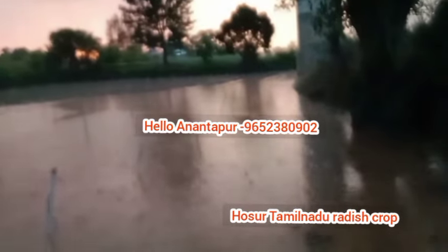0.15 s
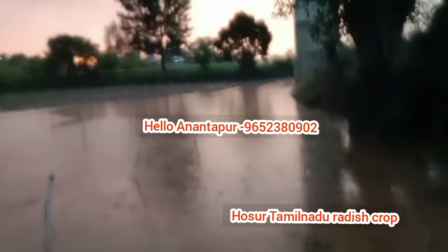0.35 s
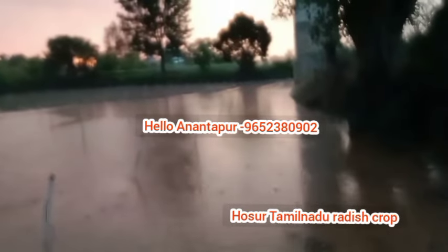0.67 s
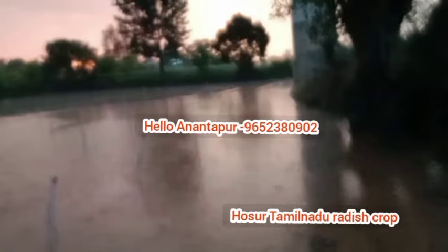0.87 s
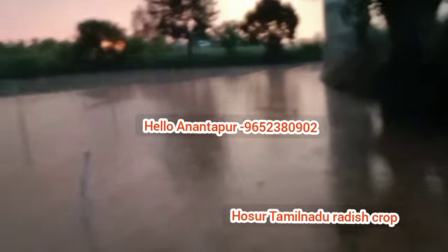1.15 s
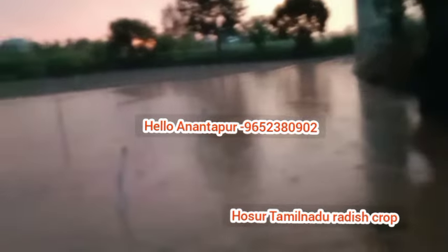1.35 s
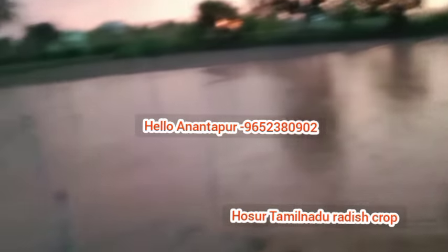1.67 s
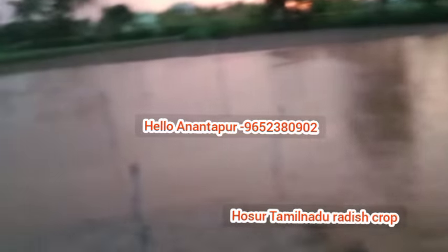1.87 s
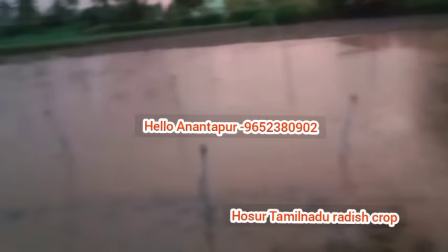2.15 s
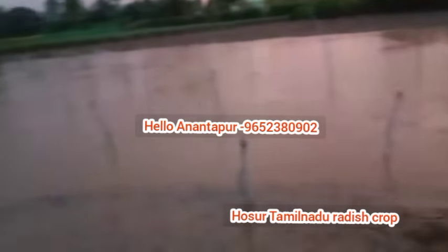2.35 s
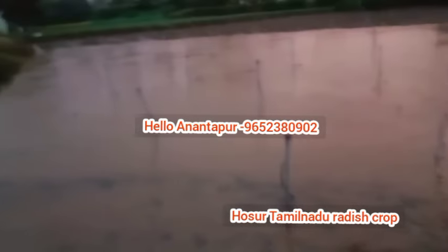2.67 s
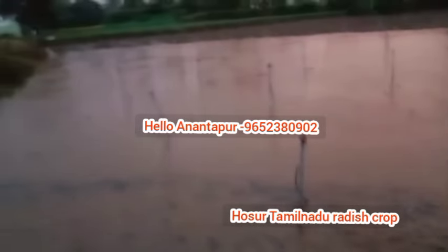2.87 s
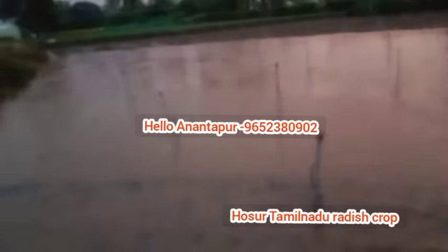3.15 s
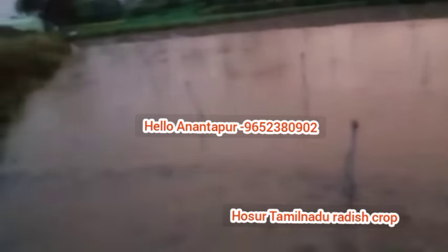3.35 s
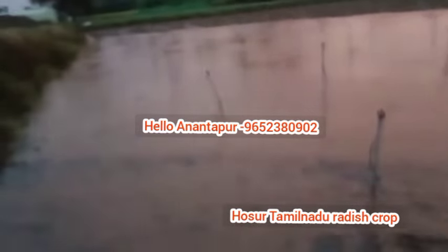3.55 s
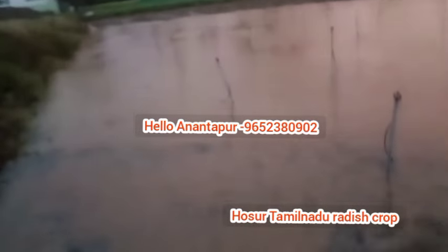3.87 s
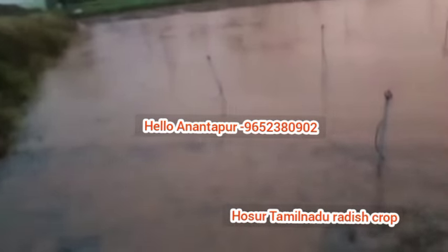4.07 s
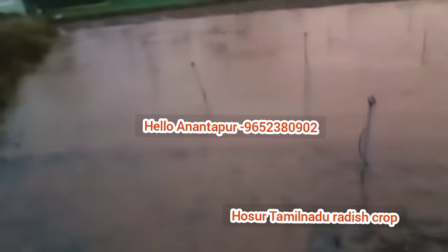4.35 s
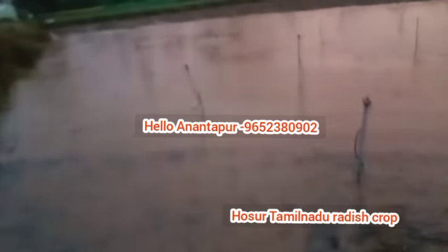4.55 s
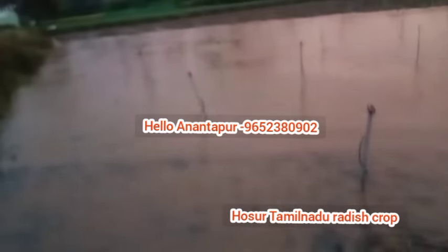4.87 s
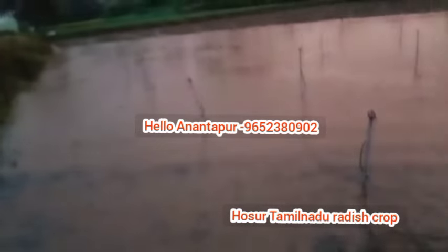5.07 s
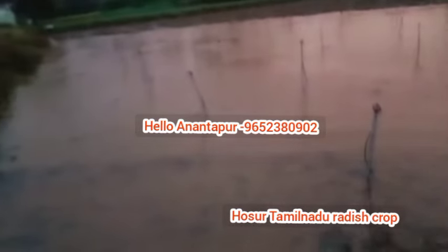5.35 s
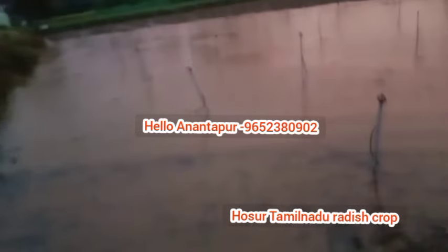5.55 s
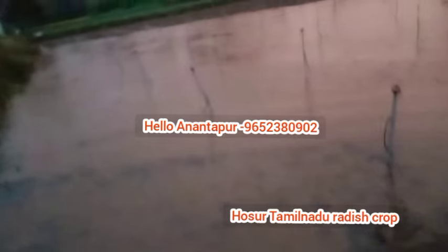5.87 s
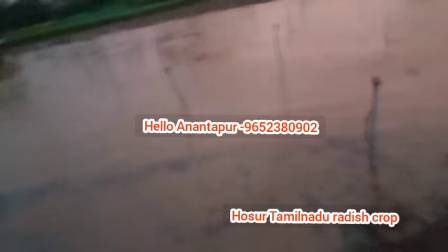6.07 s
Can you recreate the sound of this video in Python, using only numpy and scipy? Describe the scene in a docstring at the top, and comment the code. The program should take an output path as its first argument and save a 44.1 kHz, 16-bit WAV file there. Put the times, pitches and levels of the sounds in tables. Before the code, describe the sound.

Gusty breeze buffets the microphone while soft rain patters on standing water; close drops snap and plop, and faint thin trills emerge at the end.

```python
"""A breeze rumbles up close over steady rain on a flooded field, as a small, dull microphone hears it.
Wind is shaped noise that gusts; far rain is many tiny grains blurred into drumming, splashing and hiss.
Nearer drops are short bursts of noise, knocks and ringing tones; trapped bubbles plink upward in pitch.
Late on there is a watery swish, made of noise in rising resonances, and then thin trills of narrow noise."""
import sys
import numpy as np
from scipy import signal
from scipy.fft import rfft, irfft, next_fast_len
from scipy.io import wavfile
from scipy.ndimage import uniform_filter1d, map_coordinates

SR = 44100
rng = np.random.default_rng(int(sys.argv[2]) if len(sys.argv) > 2 else 0)


def store_wav(level_fs):
    """Save 16-bit WAV to argv[1]."""
    pcm = np.round(np.clip(np.atleast_2d(level_fs), -1, 1) * 32767)
    wavfile.write(sys.argv[1], SR, pcm.T.astype(np.int16))


N = 273861
TIME = np.arange(N) / SR  # [s]

# Levels in the tables come before any trim in the functions and before the final filters.

# the breeze between gusts: (time [s], deep boom [dB], low rumble [dB], higher rush [dB])
WIND = [(0, -28, -27, -32), (1.05, -31, -23.5, -32), (1.8, -30.5, -22, -31), (2.2, -35.5, -28, -36.5),
        (2.85, -53.5, -24.5, -36.5), (3.3, -51.5, -23, -37), (3.58, -41, -28.5, -39.5),
        (3.95, -43, -25, -38.5), (4.35, -43, -22, -34.5), (4.8, -35.5, -22.5, -36.5), (5.5, -33, -22, -33),
        (6.21, -31.5, -24, -38)]
# gusts and lulls on top of it: (middle [s], half length [s], change [dB])
GUSTS = [(0.35, 0.15, 5), (0.937, 0.14, 6.5), (1.251, 0.012, 7), (1.646, 0.066, 3.5), (2.356, 0.037, 7.5),
         (2.52, 0.027, -2), (3.27, 0.016, -8.5), (3.578, 0.017, -7), (3.879, 0.012, 6.5),
         (4.038, 0.015, 5.5), (4.587, 0.029, -5), (4.835, 0.068, -5.5), (4.998, 0.066, 6.5),
         (5.366, 0.018, 7.5), (5.472, 0.018, 4), (5.707, 0.02, 5.5), (5.236, 0.047, -2)]
# deep buffets of wind on the microphone: (crest [s], half length [s], level [dB], pitch [Hz])
BUFFETS = [(0.395, 0.068, -22, 116), (2.646, 0.014, -24.5, 89), (5.341, 0.041, -21.5, 134),
           (5.633, 0.099, -23.5, 168)]
# tone colour of the wind's three layers: (frequency [Hz], level per Hz [dB])
BOOM_COLOUR = [(22, -39), (40, -21), (62, -3.5), (110, 2), (170, -7), (400, -63), (2000, -100)]
RUMBLE_COLOUR = [(22, -55), (40, -39.5), (62, -8.5), (110, -11), (150, -0.5), (200, 2.5), (285, -5.5),
                 (370, -4), (480, -14), (700, -23), (1200, -94), (4000, -100)]
RUSH_COLOUR = [(250, -7.5), (520, 4.5), (720, -1), (1000, -7), (1400, -19.5), (2000, -28), (3000, -85),
               (8000, -92)]
RUMBLE_TRIM_DB = -1.32
FLUTTER_DB, FLUTTER_PER_S = 1.5, 12  # random flutter of the gusts
RUSH_FOLLOWS = 0.19  # the rush takes this share of a gust's change in dB

# rain drumming on the water further off: (time [s], level [dB])
ROAR_LEVEL = [(0, -42), (0.3, -37), (0.7, -43), (1.0, -37), (1.35, -38), (1.7, -40), (2.3, -40.5),
              (2.9, -48.5), (3.7, -49.5), (3.95, -49), (4.7, -48), (5.2, -52), (5.38, -42), (5.6, -55.5),
              (6.21, -58)]
# tone colour of that drumming: (frequency [Hz], level per Hz [dB])
ROAR_COLOUR = [(350, -24.5), (620, -3), (850, 2.5), (1150, -0.5), (1450, -11), (2000, -25), (3000, -62.5)]

# the rain: (time [s], splash on the water [dB], far hiss [dB], fine spray [dB])
RAINFALL = [(0, -52.5, -67, -59), (1.45, -60, -65, -65), (1.9, -56, -65.5, -59.5), (2.4, -52, -61, -54),
            (2.75, -56.5, -65, -59.5), (3.2, -54.5, -65.5, -59.5), (3.6, -52.5, -67, -55.5),
            (3.95, -56.5, -70.5, -65), (4.25, -51.5, -68, -54.5), (4.75, -55, -67, -86.5),
            (4.95, -56, -65.5, -63), (5.25, -47.5, -71, -54.5), (5.55, -55, -67, -82),
            (6.21, -52, -70.5, -63)]
# tone colour of the rain's three layers: (frequency [Hz], level per Hz [dB])
SPLASH_COLOUR = [(900, -21.5), (1400, 4.5), (1850, 5), (2300, -8), (2900, -26), (4000, -16), (7000, -83)]
HISS_COLOUR = [(2000, -12.5), (2900, -16.5), (3700, 3.5), (5100, -4), (6000, -17), (6700, -13), (8000, -25),
               (9200, -49), (11000, -35), (14000, -44.5)]
SPRAY_COLOUR = [(1200, -14), (2000, 2.5), (2900, 0.5), (4000, -1), (5300, 3), (6100, -14), (6900, -7),
                (8000, -24), (9200, -49), (14000, -53)]

# lighter drops a little further off: (time [s], peak [dB])
TAPS = [(0.096, -53), (0.167, -45), (0.699, -45), (1.094, -56), (1.506, -52), (1.528, -42.5),
        (1.759, -42.5), (2.825, -44.5), (3.102, -44.5), (3.609, -42), (3.629, -46), (3.646, -43),
        (3.783, -44), (4.292, -43.5), (4.425, -42), (6.101, -43)]
# tone colour of those drops: (frequency [Hz], level per Hz [dB])
TAP_COLOUR = [(700, -9), (1400, 0), (2700, -5.5), (4200, 2.5), (5400, -9), (6100, -15), (6900, -15),
              (8200, -33), (9300, -45.5), (14000, -54)]

# handfuls of droplets landing together: (crest [s], half length [s], level [dB rms], centre [Hz])
FLURRIES = [(0.183, 0.019, -66.5, 4130), (0.537, .01, -67, 4120), (0.985, 0.0084, -61, 4130),
            (1.114, .012, -64, 4340), (1.96, 0.02, -71, 5350), (2.125, 0.018, -63, 4130),
            (2.225, 0.019, -65, 3180), (2.484, 0.016, -64.5, 2520), (2.85, 0.022, -67, 3200),
            (2.955, 0.014, -68, 6400), (4.152, 0.0091, -72, 6300), (4.235, 0.033, -65, 2270),
            (4.359, 0.0073, -62, 3300), (6.13, .02, -69, 5400)]
FLURRY_WIDTH = 0.15  # width of each filter pass, as a share of the centre

# close drops that ring in several short resonances: (time [s], list of (pitch [Hz], peak [dB]))
SPLATS = [(0.2853, [(1950, -31.5), (3350, -34.5), (4500, -33.5), (6800, -49)]), (0.527, [(2900, -40),
          (3900, -50), (5400, -45), (6900, -47)]), (1.7548, [(3150, -25.5), (3900, -24.5), (4500, -34.5),
          (5400, -39), (7400, -40.5)]), (2.3605, [(4600, -38), (6400, -42), (6950, -41)]),
          (3.659, [(4400, -32), (5100, -30), (6200, -41), (7100, -38), (7900, -41)]), (4.183, [(1200, -26),
          (1850, -36)]), (4.4223, [(2700, -43), (5100, -40), (6800, -40), (7700, -45)]),
          (5.7082, [(2100, -27), (2700, -25.5), (3400, -25.5), (4100, -30), (5300, -35)]),
          (6.095, [(4350, -31), (5500, -41), (6800, -37), (8100, -45), (10900, -41), (12100, -51)])]
SPLAT_T60_S, SPLAT_ATTACK_S, SPLAT_SCATTER_S = 0.012, 0.0001, 0.001

# close drops on open water:
# (time [s], peak [dB], pitch [Hz], time to the crest [cycles], sharp snap [dB re peak])
TICKS = [(1.107, -35, 4550, 1.3, -13), (1.575, -40, 6600, 4, 10), (1.951, -37, 8100, 3.6, 11),
         (2.361, -22.5, 1300, 1.9, 3.5), (3.6342, -18.5, 2450, 0.7, -44), (3.6615, -12, 990, 0.55, -10),
         (4.1839, -21.5, 1460, 0.95, -32), (4.423, -20, 3750, 0.68, -11), (5.4366, -11.5, 1120, 0.5, 8.5),
         (5.741, -37, 7900, 3.6, 6), (6.0965, -34, 2300, 0.44, 14)]
# the microphone's treble colour, heard on the snaps: (frequency [Hz], gain [dB])
SNAP_COLOUR = [(400, -13), (1200, 0), (2800, -26.5), (4000, -2), (5500, -6.5), (8000, -18.5), (9300, -30),
               (10800, -17), (12700, -10), (15000, -46.5)]

# bubbles: (time [s], peak [dB], starting pitch [Hz], rise [octaves per s], time to fall 60 dB [s])
PLINKS = [(1.34, -24.5, 1734, 35, 0.036), (5.116, -41, 2900, 4, .04), (5.174, -23.5, 1620, 15, 0.02),
          (5.272, -35, 1920, 10, .04), (5.307, -29, 1190, 7.7, 0.059)]

# brief watery swish: (crest [s], half length [s], level [dB])
SWISHES = [(5.108, 0.07, -51.5)]
# resonances of a swish, at its crest: (pitch [Hz], width of each filter pass [Hz], level [dB])
SWISH_MODES = [(2530, 230, 11), (4960, 520, -1), (5600, 400, -15.5), (6430, 240, -12)]
SWISH_RISE_OCT_PER_S = .25

# thin far trills, perhaps insects: (pitch [Hz], width of each filter pass [Hz], level [dB rms])
TRILLS = [(1910, 28, -59), (2300, 41, -67), (3060, 35, -67), (3460, 23, -69.5)]
TRILL_START_S, TRILL_ATTACK_S, TRILL_TRIM_DB = 5.52, 0.5, 0.5
TRILL_WAVER_DB, TRILL_WAVER_PER_S = 3.5, 13

FLOOR_DB = -89.5  # the microphone's own hiss
CUTOFF_HZ = 14400


def from_db(db):
    """Turn decibels into a plain multiplier."""
    return 10 ** (np.asarray(db) / 20)


def rms_one(x):
    """Scale a sound to an average strength (rms) of 1."""
    return x / np.sqrt(np.mean(x ** 2) + 1e-20)


def in_time(rows):
    """Draw one curve over time for each column of a table."""
    s, *columns = np.transpose(rows)
    return [np.interp(TIME, s, column) for column in columns]


def swell_at(s, half_s):
    """A bell-shaped rise and fall."""
    return np.exp(-((TIME - s) / half_s) ** 2 / 2)


def drift(per_s):
    """Slow random wandering with spread 1."""
    # worked out at every 40th sample; the first 2000 steps let the filter settle
    r = np.exp(-80 * np.pi * per_s / SR)
    chance = rng.standard_normal(N // 40 + 2002)
    slow = signal.lfilter([1], [1, -2 * r, r * r], chance)[2000:]
    return np.interp(np.arange(N) / 40, np.arange(len(slow)), rms_one(slow))


def add(out, s, sound):
    """Mix a short sound in at a time."""
    at = int(np.clip(round(s * SR), 0, N - 1))
    out[at:at + len(sound)] += sound[:N - at]


def colour(x, spectrum):
    """Filter a sound to follow a spectrum, with no ringing ahead of time (minimum phase)."""
    size = 2 * next_fast_len(N // 2 + 4096)
    hz, level_db = np.transpose(spectrum)
    bins = np.maximum(np.fft.rfftfreq(size, 1 / SR), 1)
    gain = from_db(np.interp(np.log(bins), np.log(hz), level_db))
    # folding the cepstrum forward in time gives the minimum-phase filter
    cepstrum = irfft(np.log(gain))
    cepstrum[1:size // 2] *= 2
    cepstrum[size // 2 + 1:] = 0
    return irfft(rfft(x, size) * np.exp(rfft(cepstrum)))[:N]


def resonance(x, hz, width_hz):
    """A two-pole band-pass with gain 1 on top."""
    r = np.exp(-np.pi * width_hz / SR)
    top = np.array([1, 0, -1]) * (1 - r * r) / 2
    return signal.lfilter(top, [1, -2 * r * np.cos(2 * np.pi * hz / SR), r * r], x)


def narrow(x, hz, width_hz):
    """Pass a sound twice through one resonance and scale it to rms 1."""
    return rms_one(resonance(resonance(x, hz, width_hz), hz, width_hz))


def dull(x, cut_hz):
    """The microphone takes in little above its upper edge."""
    low_pass = signal.butter(6, min(cut_hz, SR / 2 - 1), fs=SR, output="sos")
    return signal.sosfilt(low_pass, x)


def flicker(x, depth_db, hold_s, size=512):
    """Narrow bands swell and fade at random, so the sound flickers and warbles; rms 1."""
    hop = size // 4
    bands = signal.stft(x, nperseg=size, noverlap=size - hop)[2]
    r = np.exp(-hop / (SR * hold_s))
    chance = signal.lfilter([1], [1, -2 * r, r * r], rng.standard_normal(bands.shape), axis=1)
    # close neighbours share part of their swell
    chance = rms_one(uniform_filter1d(chance, size=3, axis=0))
    gain = from_db(depth_db * 2 * np.tanh(chance / 2))
    return rms_one(signal.istft(bands * gain, nperseg=size, noverlap=size - hop)[1][:N])


def ring(clicks, hz, t60):
    """A unit click sets a sine of height 1 ringing; it falls by 60 dB in t60 seconds."""
    r = from_db(-60 / (t60 * SR))
    w = 2 * np.pi * min(hz, SR / 2 - 1) / SR
    return signal.lfilter([0, r * np.sin(w)], [1, -2 * r * np.cos(w), r * r], clicks + 1e-18)


def patter(per_s, low_hz, high_hz, cycles, spread_db, count=20):
    """Drops of random size fall at random; each rings for some cycles at one of many pitches."""
    sizes = from_db(spread_db * np.minimum(rng.exponential(1, N), 4)) * rng.choice([-1, 1], N)
    drops = sizes * (rng.random(N) < per_s / SR)
    dealt = rng.integers(0, count, N)  # which pitch each drop gets
    pitches = np.geomspace(low_hz, high_hz, count)
    # high grains die sooner and peak higher, so every pitch carries a like share
    grains = sum(hz * ring(drops * (dealt == k), hz, cycles / hz) for k, hz in enumerate(pitches))
    return rms_one(grains)


def spatter(per_s, spread_db, decay_s):
    """Middling drops throw up brief puffs of spray at random; mean power 1."""
    sizes = from_db(spread_db * np.minimum(rng.exponential(1, N), 3))
    impacts = sizes ** 2 * (rng.random(N) < per_s / SR)
    power = signal.lfilter([1], [1, -np.exp(-1 / (decay_s * SR))], impacts + 1e-18)
    return rms_one(np.sqrt(power) * rng.standard_normal(N))


def eddies(spectrum, steady_s):
    """Turbulent air: it flutters quickly but keeps its strength over longer spans."""
    air = colour(rng.standard_normal(N), spectrum)
    return air / np.sqrt(uniform_filter1d(air ** 2, int(steady_s * SR) + 1) + 1e-20)


def buffet(s, half_s, db, hz):
    """A brief push of wind makes a deep thud of noise around one pitch."""
    spectrum = [(hz / 3, -40), (hz, 0), (hz * 2, -30), (hz * 20, -110)]
    return from_db(db) * swell_at(s, half_s) * eddies(spectrum, steady_s=0.3)


def breeze():
    """Large eddies rumble and buffet at the microphone, small ones rush above; gusts lift both."""
    boom_db, rumble_db, rush_db = in_time(WIND)
    gust_db = sum(change_db * swell_at(s, half) for s, half, change_db in GUSTS)
    gust_db = gust_db + FLUTTER_DB * drift(FLUTTER_PER_S)
    boom = from_db(boom_db) * eddies(BOOM_COLOUR, steady_s=0.89)
    rumble = from_db(RUMBLE_TRIM_DB + rumble_db + gust_db) * eddies(RUMBLE_COLOUR, steady_s=0.16)
    rush = flicker(eddies(RUSH_COLOUR, steady_s=0.027), depth_db=4.0, hold_s=0.019, size=1024)
    rush = from_db(rush_db + RUSH_FOLLOWS * gust_db) * rush
    buffets = sum(buffet(*row) for row in BUFFETS)
    return boom + rumble + buffets + rush


def roar():
    """Heavy drops all over the field merge into a dull drumming that comes in waves."""
    level_db, = in_time(ROAR_LEVEL)
    drumming = patter(per_s=1500, low_hz=550, high_hz=1600, cycles=4, spread_db=2.5, count=10)
    drumming = flicker(colour(drumming, ROAR_COLOUR), depth_db=4.0, hold_s=0.017, size=1024)
    return from_db(level_db) * drumming


def rain():
    """Countless far drops blur into a flickering wash; nearer ones are grains and puffs of spray."""
    splash_db, hiss_db, spray_db = in_time(RAINFALL)
    large = patter(per_s=90, low_hz=900, high_hz=3200, cycles=5, spread_db=3.0, count=10)
    small = patter(per_s=190, low_hz=2740, high_hz=9150, cycles=3.9, spread_db=0.5, count=14)
    puffs = spatter(per_s=78, spread_db=5.5, decay_s=0.007)
    # the grains are mixed into a steady noise before both are coloured
    splash = colour(from_db(-15) * large + rng.standard_normal(N), SPLASH_COLOUR)
    splash = flicker(splash, depth_db=9.5, hold_s=0.009, size=1024)
    hiss = colour(from_db(-11.5) * small + rng.standard_normal(N), HISS_COLOUR)
    hiss = flicker(hiss, depth_db=9.5, hold_s=0.008, size=768)
    spray = flicker(colour(puffs, SPRAY_COLOUR), depth_db=7.0, hold_s=0.007, size=512)
    hiss_db = hiss_db + 5.5 + 1.8 * drift(18)
    return from_db(splash_db) * splash + from_db(hiss_db) * hiss + from_db(spray_db - 6.0) * spray


def taps(level_db, attack_s, decay_s, spray_db, spray_s):
    """A light drop is a tiny crack and a short spray of noise, each drop with fresh noise."""
    out, t = np.zeros(N), TIME[:SR // 16]
    fall = np.exp(-t / decay_s) + from_db(spray_db) * np.exp(-t / spray_s)
    envelope = (1 - np.exp(-t / attack_s)) * fall
    for s, peak_db in TAPS:
        add(out, s, from_db(peak_db + level_db) * envelope * rng.standard_normal(len(t)))
    return colour(out, TAP_COLOUR)


def flurries(level_db):
    """Droplets land in clusters; those of one cluster are alike in size, and so in pitch."""
    grains = spatter(per_s=500, spread_db=3.0, decay_s=.002)
    return sum(from_db(db + level_db) * swell_at(s, half) * narrow(grains, hz, FLURRY_WIDTH * hz)
               for s, half, db, hz in FLURRIES)


def splats():
    """A drop breaks up as it lands; its resonances start a moment apart and die quickly."""
    out, t = np.zeros(N), TIME[:SR // 25]
    envelope = (1 - np.exp(-t / SPLAT_ATTACK_S)) ** 2 * from_db(-60 * t / SPLAT_T60_S)
    for s, modes in SPLATS:
        for hz, peak_db in modes:
            tone = from_db(peak_db - 2.5) * envelope * np.sin(2 * np.pi * hz * t)
            add(out, s + SPLAT_SCATTER_S * rng.random(), tone)
    return out


def close_drops(contact_s, tail_db, rebound_db):
    """Each impact is a sharp snap, a short knock, a weaker rebound and a faint, short tail of noise."""
    knocks, snaps, t = np.zeros(N), np.zeros(N), TIME[:SR // 20]
    tail_fall = from_db(tail_db - 60 * t / .05)  # falls by 60 dB in 0.05 s
    rebound_s = rng.uniform(.0006, .0018, len(TICKS))
    for (s, peak_db, hz, cycles, snap_db), later in zip(TICKS, rebound_s):
        peak = from_db(peak_db)
        age = t * hz / cycles  # 1 at the crest
        knock = peak * np.cos(2 * np.pi * (t * hz - cycles)) * (age * np.exp(1 - age)) ** 3
        tail = rms_one(resonance(rng.standard_normal(len(t)), hz=4050, width_hz=2800)) * tail_fall
        add(knocks, s - cycles / hz / 2, knock)
        add(knocks, s + later, from_db(rebound_db) * knock)  # gives each drop its own ripple of colour
        add(knocks, s, peak * tail)
        add(snaps, s, -from_db(peak_db + snap_db + 3.0) * np.exp(-t / contact_s))
    return dull(knocks, cut_hz=5850) + colour(snaps, SNAP_COLOUR)


def plinks(swell_s, life_s):
    """A trapped bubble rings, rises in pitch as it nears the surface, and stops when it gets there."""
    out, t = np.zeros(N), TIME[:SR // 16]
    alive = (1 - np.exp(-t / swell_s)) * np.exp(-(t / life_s) ** 4)
    for s, peak_db, hz, rise, t60 in PLINKS:
        phase = 2 * np.pi * np.cumsum(hz * 2 ** (rise * t)) / SR
        add(out, s, np.sin(phase) * from_db(peak_db - 60 * t / t60) * alive)
    return out


def swishes():
    """Water sloshes briefly: a swell of noise in a few rising resonances."""
    noise, out = rng.standard_normal(N), 0
    wash = sum(from_db(db) * resonance(resonance(noise, hz, width), hz, width)
               for hz, width, db in SWISH_MODES)
    wash = flicker(rms_one(wash), depth_db=4.0, hold_s=0.015, size=768)
    for s, half, db in SWISHES:
        # reading the noise ever faster raises its pitch
        speed = 2 ** (SWISH_RISE_OCT_PER_S * np.clip(TIME - s, -2 * half, 2 * half))
        rising = map_coordinates(wash, [np.cumsum(speed) % (N - 1)], order=3)
        out = out + from_db(db) * swell_at(s, half) * rising
    return out


def trills():
    """Narrow bands of noise sound like thin tones far across the field; each wavers by itself."""
    noise, out = rng.standard_normal(N), 0
    for hz, width, db in TRILLS:
        level_db = db + TRILL_TRIM_DB + TRILL_WAVER_DB * drift(TRILL_WAVER_PER_S)
        out = out + from_db(level_db) * narrow(noise, hz, width)
    return np.clip((TIME - TRILL_START_S) / TRILL_ATTACK_S, 0, 1) * out


def scene():
    """Mix all the layers in open air, with no reverberation."""
    weather = breeze() + roar() + rain()
    drops = taps(level_db=1.5, attack_s=0.0014, decay_s=0.0062, spray_db=-1.0, spray_s=0.027)
    drops = drops + flurries(level_db=9.5) + splats()
    drops = drops + close_drops(contact_s=.00004, tail_db=-32.5, rebound_db=-11)
    bubbles = plinks(swell_s=.001, life_s=.016)
    floor = from_db(FLOOR_DB) * rng.standard_normal(N)
    return (weather + drops + bubbles + swishes() + trills() + floor)[None]


def record(dry):
    """Cut the deepest bass and the top."""
    no_sub = signal.sosfilt(signal.butter(4, 33, "high", fs=SR, output="sos"), dry)
    return signal.sosfilt(signal.ellip(10, .1, 80, CUTOFF_HZ, fs=SR, output="sos"), no_sub)


dry = scene()
out = record(dry)
store_wav(out)
```